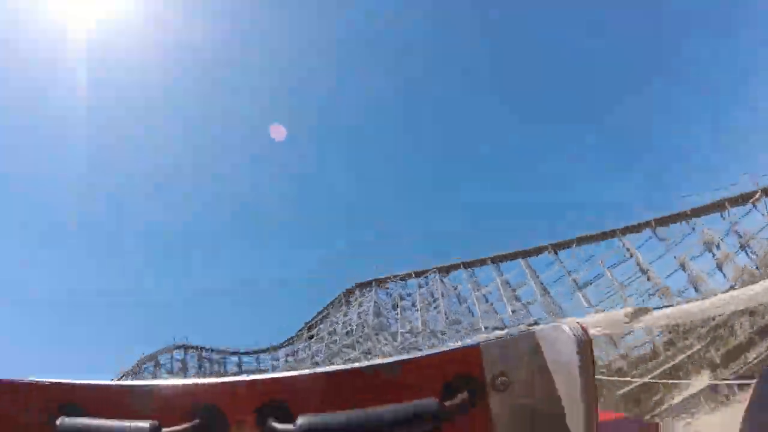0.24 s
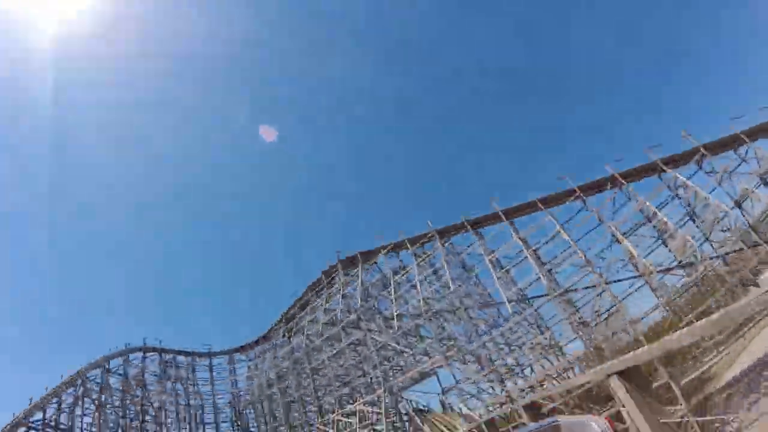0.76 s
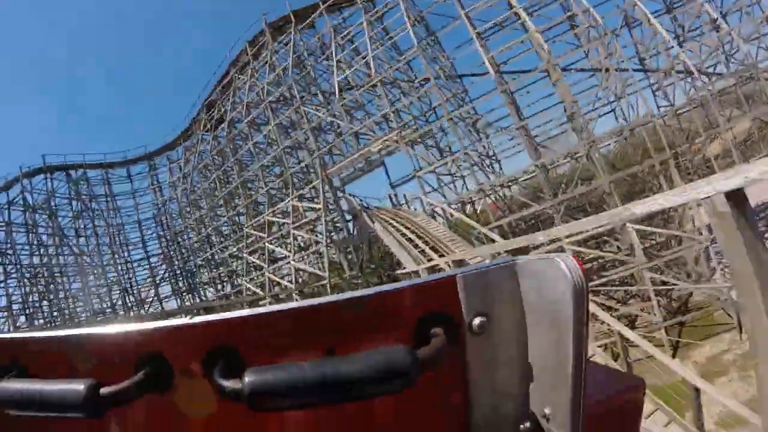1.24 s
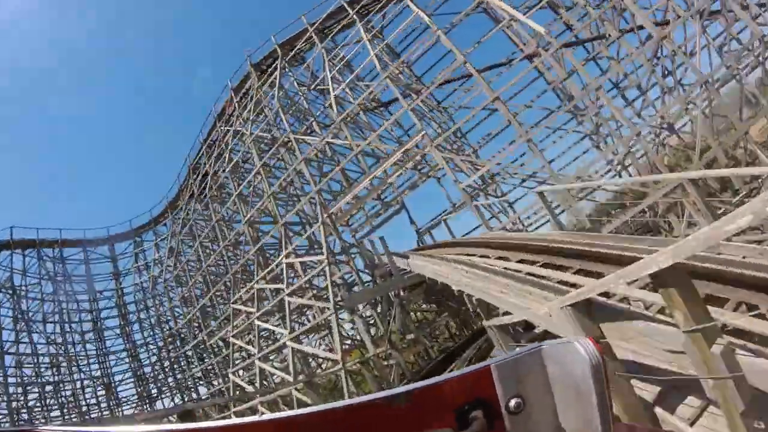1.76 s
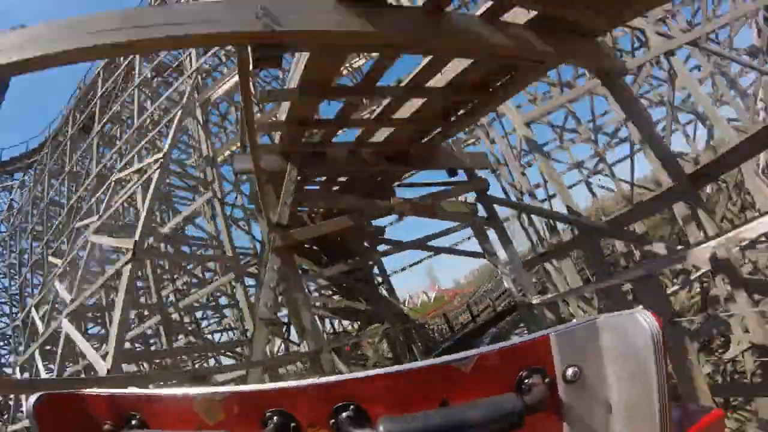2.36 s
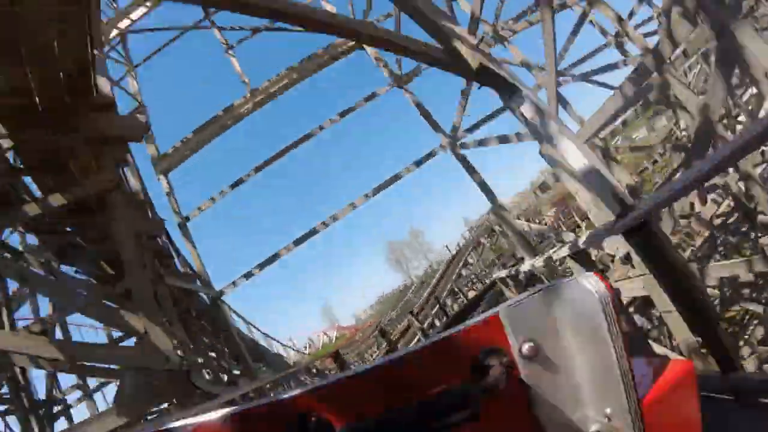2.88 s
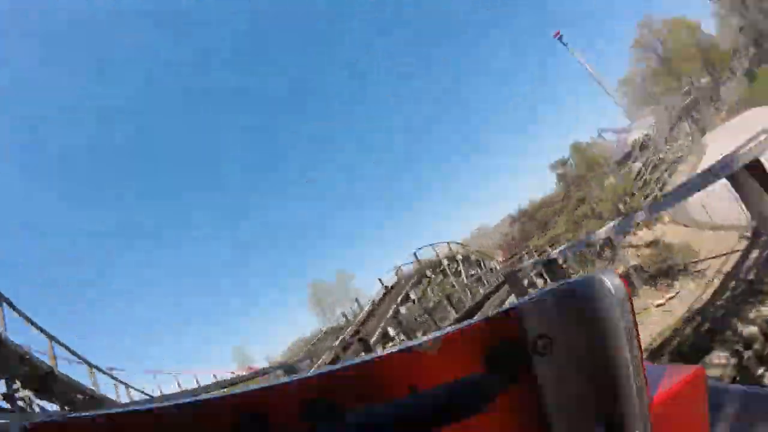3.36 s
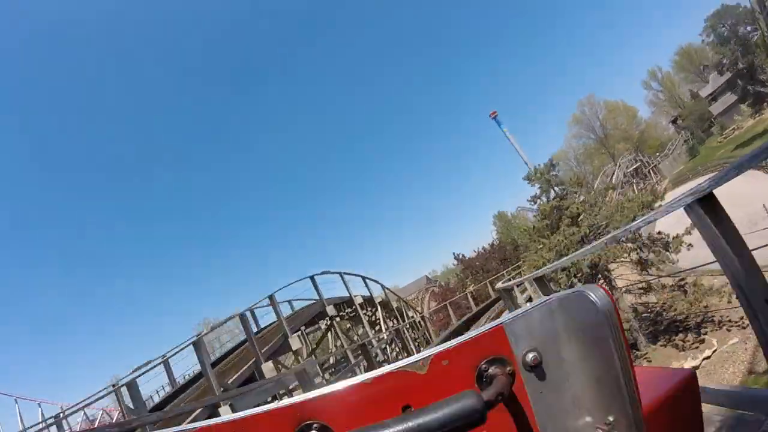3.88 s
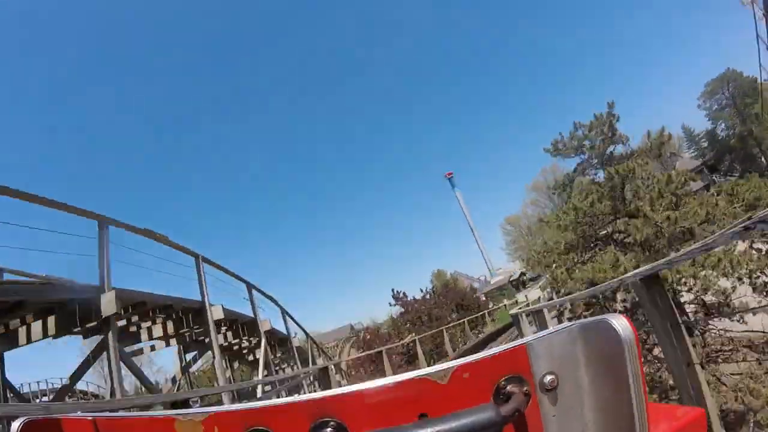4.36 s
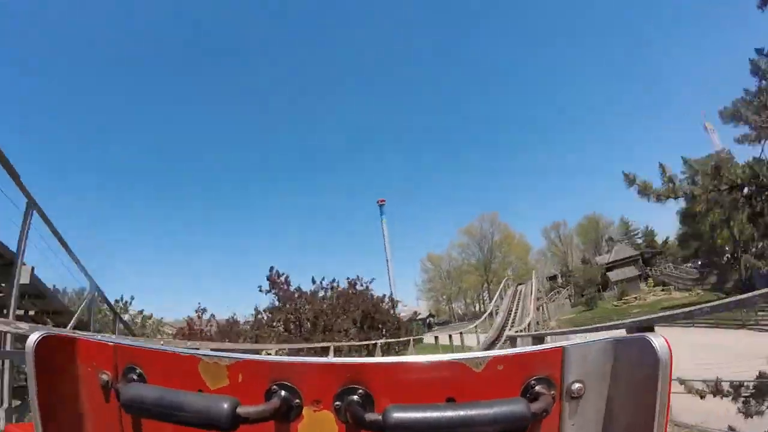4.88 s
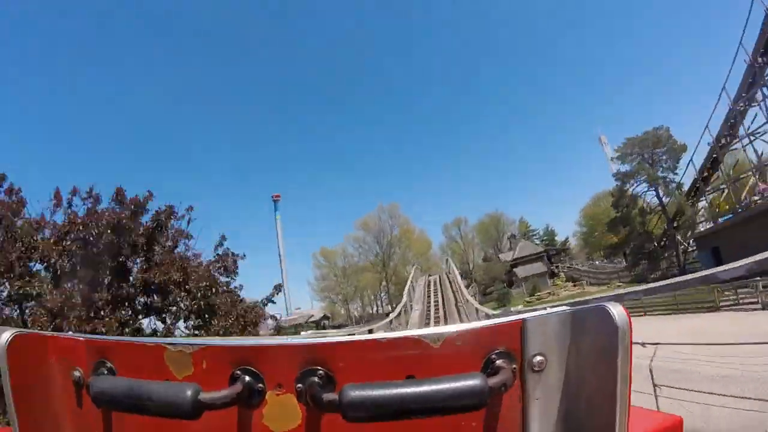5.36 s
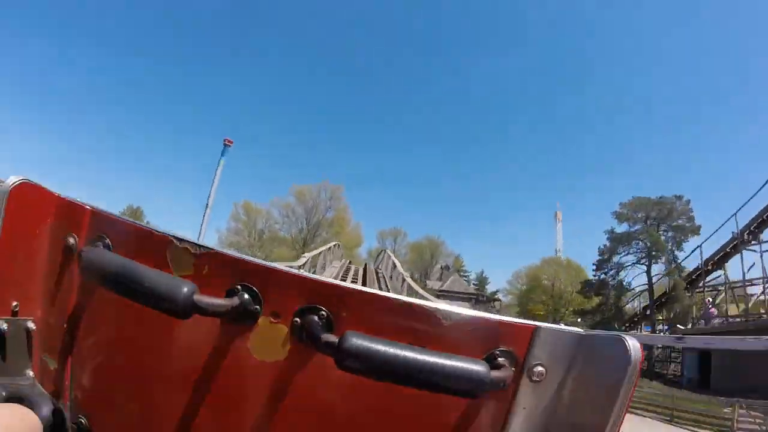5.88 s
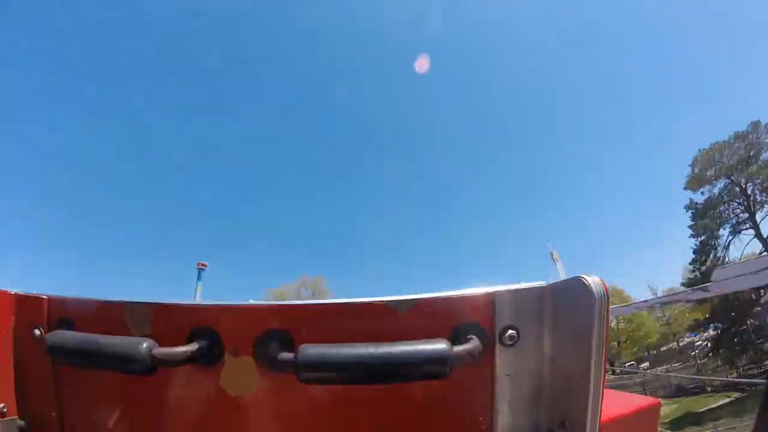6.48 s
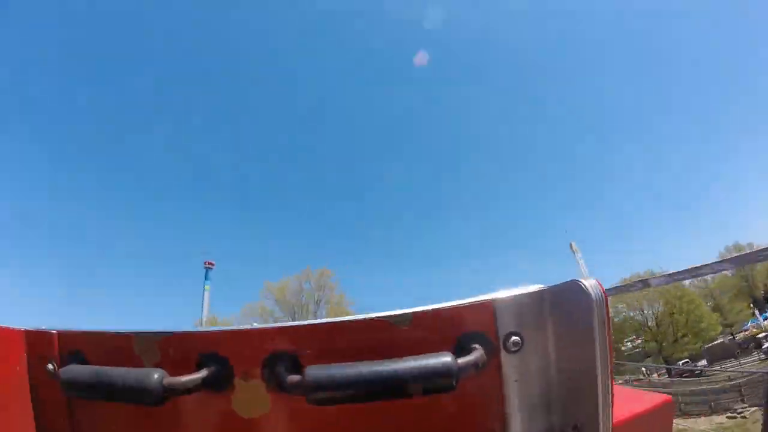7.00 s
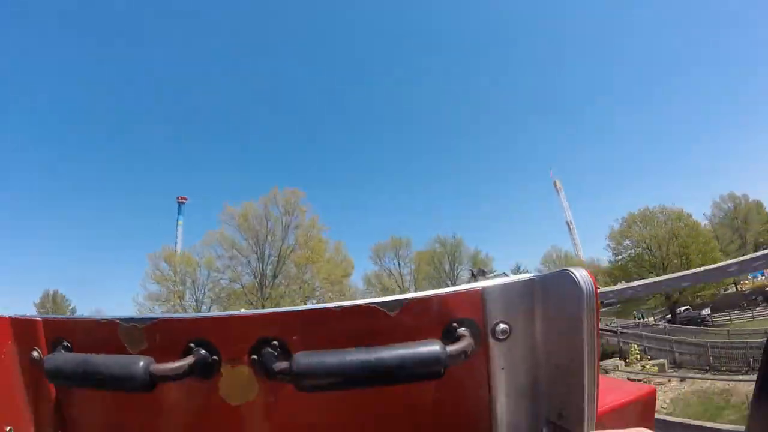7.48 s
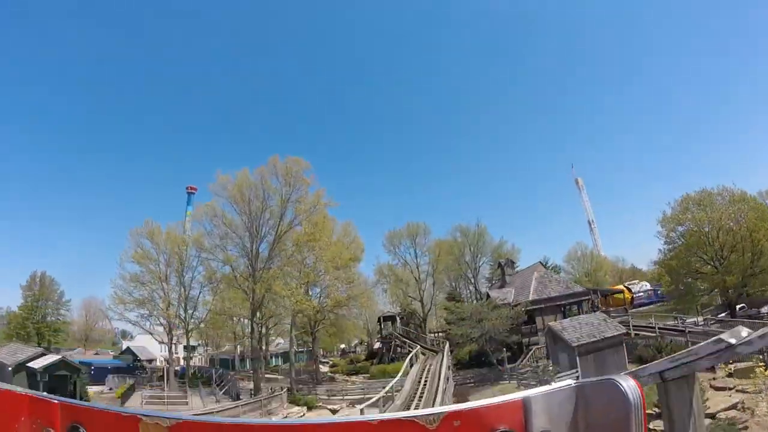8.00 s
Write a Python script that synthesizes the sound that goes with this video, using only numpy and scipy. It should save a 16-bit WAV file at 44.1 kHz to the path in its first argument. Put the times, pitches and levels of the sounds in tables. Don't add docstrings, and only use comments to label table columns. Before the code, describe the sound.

A close, rough outdoor ride sound: dense low wheel rumble, gritty midrange rattle and duller hiss, surging and easing with load. Irregular clacks ring the microphone case like a small hollow box, while deep jolts and tiny bright ticks come through the mount. Air pressure thumps the microphone, gusting near two seconds and cutting the sound into brief dips between six and seven, before the clatter runs on.

```python
import sys
import numpy as np
from scipy import signal
from scipy.fft import rfft, irfft
from scipy.io import wavfile
from scipy.ndimage import uniform_filter1d

SR = 44100
rng = np.random.default_rng(int(sys.argv[2]) if len(sys.argv) > 2 else 0)


def store_wav(level_fs):
    pcm = np.round(np.clip(np.atleast_2d(level_fs), -1, 1) * 32767)
    wavfile.write(sys.argv[1], SR, pcm.T.astype(np.int16))


def nominal_scale(level):
    x = np.asarray(level, float) / 20
    return 10 ** x


N = 363384
T = np.arange(N) / SR
HZ = np.fft.rfftfreq(N, 1 / SR) + 1e-3

# start in seconds, rattle level in dB, rub in dB.
WHEEL_LOAD = [(0.0, -40, 1.5), (0.48, -47.5, 2), (0.73, -36, -2.5), (1.24, -29.5, -2.5), (2.16, -32.5, 2.5),
              (2.36, -36, -2), (2.94, -29, 1.5), (3.42, -33, 0), (3.63, -30, -0.5), (3.95, -34, 0.5),
              (5.12, -30.5, -1), (5.21, -27, 1), (5.55, -33.5, 0), (6.17, -32, 5.5), (6.52, -36.5, 4.5),
              (6.75, -36, 3.5), (8.01, -37, 1.5), (8.24, -32.5, 5.5)]
# middle in seconds, depth in dB.
WHEEL_LULLS = [(0.06, 4), (0.72, 2.5), (0.83, 2.5), (1.06, 3), (3.28, 1.5), (4.08, 4.5), (4.92, 5),
               (5.165, 5.5), (5.56, 5), (5.7, 3.5), (1.29, 1), (1.945, 1.5), (3.655, 3.5), (5.005, -0.5),
               (3.73, -1), (7.16, -0.5), (7.72, -1.5)]
# start in seconds, peak in dB, bright part in dB, t60 in seconds.
TRACK_JOINTS = [(0.179, -23, -24, 0.72), (0.65, -21, -26, 0.3), (0.87, -18.5, -20, 0.21),
                (1.085, -11, -22, 0.26), (1.181, -6.5, -31, 0.1), (1.31, -22, -23, 0.86),
                (1.462, -20, -22, 0.34), (1.617, -16.5, -27, 0.26), (1.964, -11, -30, 0.85),
                (2.068, -11.5, -27, 0.6), (2.461, -15.5, -22.5, 0.89), (2.558, -14.5, -24, 0.7),
                (2.942, -17, -22, 0.73), (3.107, -12, -22.5, 0.28), (3.441, -14, -20, 0.25),
                (3.567, -8.5, -24.5, 0.083), (3.672, -16.5, -24, 0.63), (4.13, -23, -29, 0.063),
                (4.313, -21, -16, 0.9), (4.423, -6, -22, 0.051), (4.757, -18, -20.5, 0.39),
                (4.865, -16, -24, 0.15), (5.024, -20.5, -18.5, 0.62), (5.192, -22.5, -22, 0.85),
                (5.787, -13, -30, 0.39), (6.175, -18, -28, 1), (6.443, -5.5, -31, 0.087),
                (7.552, -19, -24, 0.22), (8.052, -9.5, -24.5, 0.33), (8.131, -13.5, -27, 0.98)]
# start in seconds, peak in dB.
BOLT_BUMPS = [(0.982, -14.5), (1.206, -11), (0.27, -14.5), (1.792, -18.5), (2.19, -21.5), (1.39, -11.5),
              (3.331, -15.5), (4.39, -10.5), (5.235, -23), (5.305, -19), (5.624, -20), (6.245, -13),
              (7.39, -24), (2.241, -15.5), (2.525, -16), (2.832, -21), (2.984, -15), (3.039, -14),
              (3.067, -13.5), (3.5, -27), (3.609, -14), (5.669, -16.5), (4.361, -18.5), (4.689, -27),
              (4.891, -15), (5.114, -28), (5.488, -24), (5.6, -19), (5.992, -17.5), (6.492, -22),
              (0.53, -27), (0.585, -37), (0.7, -22), (6.656, -36), (7.598, -14), (6.868, -20),
              (7.123, -17.5), (7.658, -17), (7.894, -16.5)]
# start in seconds, peak in dB.
FITTING_JINGLES = [(0.156, -33), (0.226, -35.5), (0.255, -32), (0.3012, -35), (0.386, -42), (0.53, -50),
                   (1.4, -33), (1.86, -28), (3.05, -30), (6.09, -32), (6.465, -33), (7.356, -28),
                   (0.982, -27.5), (1.0879, -32), (1.1179, -25), (1.1792, -25), (1.2087, -22.5),
                   (4.665, -27.5), (1.9719, -14.5), (2.175, -25.5), (4.545, -25), (2.5112, -34),
                   (2.813, -25), (3.605, -21.5), (3.334, -25.5), (3.421, -26), (3.85, -26), (3.7584, -31),
                   (4.137, -27), (4.4233, -39), (4.5101, -27), (5.1911, -24), (5.305, -28), (5.9638, -31),
                   (6.016, -39), (6.5415, -39), (6.86, -24), (6.9465, -27), (7.1256, -29), (5.235, -27),
                   (5.62, -31), (8.2112, -42)]
# frequency in Hz, density in dB per Hz.
CASE_PATH = [(45, 1), (70, -9), (120, -7.5), (240, -15), (880, -24), (1430, -15), (2250, -35.5),
             (2850, -25), (3700, -49), (5700, -57), (7400, -59.5), (9000, -73.5), (12500, -90),
             (16000, -99)]
# centre in Hz, width in Hz, lift in dB.
CASE_RESONANCES = [(1390, 48, -3.5), (2770, 850, -3.5), (4397, 120, 5.5), (5070, 650, 4.5),
                   (6235, 300, 8.5), (10700, 820, 3.5)]
# start in seconds, peak in dB, ring in Hz.
CAVITY_RAPS = [(0.2763, -16.5, 1570), (0.304, -23, 1310), (0.4798, -26.5, 1265), (0.6505, -13.5, 1450),
               (0.9772, -18, 1240), (1.0854, -11, 1390), (1.1822, -13.5, 1390), (1.209, -10, 1460),
               (1.3098, -13, 1440), (1.3473, -12, 1310), (1.461, -17, 1530), (1.5346, -14, 1290),
               (1.5589, -28, 1320), (1.6197, -11.5, 1310), (1.72, -20, 1220), (1.7915, -17, 1230),
               (1.9624, -12, 1350), (2.0702, -7, 1390), (2.2427, -19, 1520), (2.3361, -24, 1390),
               (2.3965, -21, 1310), (2.5566, -13, 1510), (2.8295, -10, 1536), (2.953, -10.5, 1480),
               (2.987, -13, 1180), (3.0415, -10, 1246), (3.0694, -20, 1440), (3.121, -10.5, 1495),
               (3.5039, -13, 1380), (3.5648, -11.5, 1465), (3.6077, -12, 1470), (3.6726, -12.5, 1440),
               (4.1315, -12, 1520), (4.3188, -17, 1280), (4.3615, -18, 1330), (4.4269, -13, 1240),
               (4.6167, -20, 1350), (4.6897, -15.5, 1320), (4.7232, -18, 1460), (4.7596, -10.5, 1420),
               (4.8648, -14, 1380), (5.0215, -14.5, 1390), (5.118, -13.5, 1240), (5.194, -14.5, 1290),
               (5.4856, -14, 1435), (5.6027, -14.5, 1430), (5.793, -15, 1450), (5.8167, -11, 1350),
               (6.0043, -16, 1210), (6.1794, -26, 1470), (6.4425, -30, 1220), (6.5415, -16, 1300),
               (6.6573, -26, 1390), (6.9995, -18, 1394), (7.1107, -21, 1380), (7.556, -17, 1460),
               (7.658, -29, 1360), (7.893, -15, 1140), (8.0541, -7.5, 1444), (8.1309, -18, 1420)]
# pitch ratio, level in dB, t60 in seconds.
CAVITY_PARTNERS = [(1.7, -25, 0.015), (0.531, -9.5, 0.059), (1.136, -7.5, 0.016)]
# start in seconds, peak in dB, ring in Hz.
UPPER_TAPS = [(0.3047, -36, 2650), (0.654, -21, 2770), (1.0854, -25, 2700), (1.119, -18, 2510),
              (1.1822, -23, 2920), (1.2145, -22, 2850), (1.4611, -36, 2730), (1.9724, -16, 2770),
              (2.074, -28, 2960), (2.14, -31, 2860), (2.2428, -32, 2920), (2.397, -22, 3020),
              (2.473, -27, 2660), (2.7921, -26, 2550), (2.9487, -30, 2700), (3.1093, -32, 2300),
              (3.4446, -35, 3100), (3.5658, -31, 2670), (3.7524, -26, 2790), (4.1295, -38, 3040),
              (4.2971, -29, 2840), (4.3615, -23, 2940), (4.427, -19, 2690), (4.6885, -25, 2700),
              (4.76, -26, 3030), (4.8688, -30, 2900), (5.116, -22, 2720), (5.1876, -37, 2930),
              (5.3118, -35, 2800), (5.4869, -35, 2700), (5.7468, -23, 3020), (5.9155, -21, 2540),
              (5.965, -27, 2730), (6.02, -18.5, 2570), (6.1225, -26, 2740), (6.2113, -19, 3030),
              (6.544, -18, 2990), (6.6583, -35, 2770), (6.6862, -26, 3000), (6.878, -34, 3140),
              (7.0145, -23, 2820), (7.1227, -19, 3020), (7.3562, -29, 2900), (7.5556, -23, 2960),
              (7.6081, -24, 2900), (7.657, -24, 2380), (7.8935, -19.5, 2840), (8.0554, -18, 2920),
              (8.08, -34, 2940), (8.172, -21, 3060)]
# start in seconds, peak in dB, ring in Hz.
FRAME_JOLTS = [(1.165, -30, 132), (1.859, -13, 200), (2.069, -4.5, 205), (2.154, -21, 129),
               (2.389, -27, 86.1), (2.556, -15, 153), (0.36, -24, 100), (3.355, -26, 99.6),
               (3.488, -14, 96.9), (3.559, -18, 112), (3.754, -9.5, 86.1), (4.304, -13, 91),
               (4.427, -13, 101), (4.956, -18, 86.1), (5.062, -7.5, 172), (5.248, -21, 145),
               (5.597, -14, 118), (5.765, -12, 101.4), (5.924, -8.5, 130), (6.013, -9, 107),
               (6.14, -20, 108), (6.254, -12, 87), (6.364, -26, 110), (6.448, -19, 86.1), (6.526, -15, 97),
               (6.68, -24, 212), (6.878, -13.5, 121), (6.951, -26, 86.1), (7.119, -14, 116),
               (7.207, -26, 108), (7.366, -19, 86.1), (7.421, -21, 86.5), (7.569, -17, 128),
               (7.82, -12, 137), (8.057, -20, 129), (7.93, -19, 100)]
# start in seconds, peak in dB, ring in Hz.
AXLE_DROPS = [(0.127, -11, 50.6), (0.302, -9, 51.1), (0.79, -13.5, 52), (1.064, -30, 80.7),
              (1.96, -16, 51.1), (2.28, -26, 51.1), (2.555, -28, 65), (3.203, -24, 70.0),
              (3.727, -28, 56.5), (4.091, -13.5, 68.6), (4.293, -18, 72.7), (4.433, -31, 51.1),
              (4.77, -25, 51.1), (4.992, -29, 51.1), (5.084, -31, 51.1), (5.285, -16, 56.5),
              (5.756, -16, 80.7), (5.996, -13, 51.1), (6.255, -26, 76), (6.371, -13, 72.7), (6.606, -7, 51),
              (6.794, -16, 51.1), (7.028, -20, 51.1), (8.16, -16, 99.6)]
# trough in seconds, crest in dB, trough in dB, choke in dB, recovery in seconds.
HARD_BUFFETS = [(0.319, -3, -5, 10.5, 0.089), (2.119, -5, -5, 5, 0.025), (2.564, -26, -5.5, 4.5, 0.14),
                (3.263, -3.5, -8, 2, 0.021), (4.459, -12, -1, 3, 0.035), (6.038, -12, 0.5, 4.5, 0.093),
                (6.395, -1, -2.5, 19.5, 0.099), (6.625, -2, -6.5, 18, 0.038), (6.809, -6, -5, 11, 0.078),
                (7.049, -6.5, -4.5, 5, 0.024), (7.289, -2.5, -4.5, 3.5, 0.091)]
# trough in seconds, crest in dB, trough in dB, crest lead in seconds.
SOFT_BUFFETS = [(0.145, -6, -3, 0.019), (0.525, -20, -9, 0.036), (1.281, -14, -10, 0.026),
                (1.513, -15, -7, 0.018), (1.854, -7, -6, 0.017), (1.938, -9, -5, 0.017),
                (2.035, -5, -6, 0.032), (2.165, -14, -9, 0.026), (2.26, -10, -4, 0.023),
                (2.42, -4, -4, 0.034), (2.614, -7, -7, 0.024), (2.665, -10, -7, 0.02),
                (2.709, -5, -4, 0.021), (2.894, -8, -9, 0.019), (3.028, -11, -5, 0.029),
                (3.216, -16, -6, 0.04), (3.37, -8, -6, 0.026), (3.515, -9, -4, 0.031),
                (3.758, -6, -4, 0.028), (3.912, -13, -5, 0.016), (3.949, -13, -3, 0.02),
                (4.132, -13, -6, 0.014), (4.254, -12, -10, 0.05), (4.603, -8, -3, 0.021),
                (4.751, -12, -9, 0.018), (4.824, -14, -8, 0.015), (4.863, -10, -10, 0.018),
                (4.959, -6, -6, 0.026), (5.289, -20, -7, 0.029), (5.337, -5, -3, 0.022),
                (5.48, -5, -3, 0.019), (5.582, -7, -8, 0.042), (5.686, -6, -4, 0.038),
                (5.965, -15, -6, 0.043), (6.219, -13, -4, 0.018), (6.319, -8, -4, 0.026),
                (7.425, -12, -9, 0.034), (8.203, -19, -9, 0.045)]
# start in seconds, peak in dB, ring in Hz, bright part in dB.
MOUNT_TICKS = [(0.304, -16.5, 1990, -18), (5.411, -24, 2000, -7), (2.3968, -9, 1980, -20.5),
               (3.108, -13, 2000, -31), (6.021, -23, 1880, -0.5), (6.374, -20, 2020, -34),
               (6.5417, -12.5, 1920, -8.5), (6.61, -28, 1850, -5), (6.6867, -22, 2900, -6),
               (6.9484, -18, 1980, -14), (7.1231, -20.5, 1900, -14), (7.274, -27, 1980, -18),
               (7.657, -23, 2060, -32), (7.893, -31.5, 2110, -21)]
# middle in seconds, depth in dB, half width in seconds.
SEAT_KNOCKS = [
    (0.275, -12.5, 0.0016),
    (2.077, -14, 0.0016),
    (5.771, -7, 0.0017),
    (6.384, -12, 0.0011),
    (6.545, -9.5, 0.0011),
    (6.6889, -22, 0.00075),
    (7.128, -11.5, 0.0011),
    (8.173, -9, 0.0025),
]
# start in seconds, peak in dB.
MOUNT_SPARKS = [(0.1436, -54), (0.3002, -46), (0.412, -62), (1.0859, -60), (2.3974, -50), (2.5491, -53),
                (2.952, -61), (3.1053, -51.5), (3.3777, -62), (3.5977, -54), (4.139, -59), (4.4223, -49),
                (4.5226, -56), (4.6638, -55), (5.1148, -53), (5.2081, -50), (5.7443, -53), (5.9668, -61),
                (6.0177, -48), (6.542, -60), (6.6079, -51), (6.6867, -63), (6.7925, -55), (7.2704, -57),
                (7.3137, -50), (8.0576, -60)]
# start in seconds, level in dB.
HEADWIND = [(0, -18), (.3, -31), (.55, -29.5), (1.1, -29), (1.8, -26), (2.1, -11.5), (2.6, -27.5),
            (3.0, -21), (4.0, -27), (5.1, -23), (5.5, -25), (6.2, -26), (6.35, -34), (7.0, -29.5),
            (7.4, -26), (7.9, -41.5), (8.24, -22.5)]
# frequency in Hz, density in dB per Hz.
HEAVE_SPECTRUM = [(2, -23.5), (5, 13), (12, 2), (24, 0), (35, -4.5), (60, -21), (100, -43), (300, -120)]
# frequency in Hz, level in dB, width in Hz.
BEARING_WHINE = [(9650, -79, 6)]


def rms_one(x):
    return x / np.sqrt(np.mean(x ** 2) + 1e-20)


def at_hz(points, hz):
    point_hz, db = np.transpose(points)
    return np.interp(np.log(hz), np.log(point_hz), db)


def in_time(rows):
    s, *columns = np.transpose(rows)
    return [np.interp(T, s, c) for c in columns]


def drift(rate):
    r = np.exp(-80 * np.pi * rate / SR)
    slow = signal.lfilter([1], [1, -2 * r, r * r], rng.standard_normal(N // 40 + 2002))[2000:]
    return np.interp(np.arange(N) / 40, np.arange(len(slow)), rms_one(slow))


def causal_colour(x, gain_db):
    cepstrum = irfft(gain_db * np.log(10) / 20, N)
    cepstrum[1:N // 2] *= 2
    cepstrum[N // 2 + 1:] = 0
    return irfft(rfft(x) * np.exp(rfft(cepstrum)), N)


def ring(x, hz, t60):
    r, w = nominal_scale(-60 / (t60 * SR)), 2 * np.pi * hz / SR
    return signal.lfilter([0, np.sin(w)], [1, -2 * r * np.cos(w), r * r], x)


def struck(rows, rise, chance):
    out, t = np.zeros(N + SR), T[:SR // 8]
    for (s, db, hz, t60), phase in zip(rows, chance):
        at = round(s * SR)
        envelope = nominal_scale(db - 60 * t / t60) * (1 - np.exp(-t / rise))
        out[at:at + len(t)] += envelope * np.sin(2 * np.pi * (hz * t + phase))
    return out[:N]


def add_blow(power, s, db, rise, t60):
    at = round(s * SR)
    t = T[:min(N - at, SR // 2)]
    envelope = nominal_scale(db - 60 * t / np.clip(t60, .006, .6)) * (1 - np.exp(-t / rise))
    power[at:at + len(t)] += envelope ** 2


def rounded(x, top):
    return x / (1 + (np.abs(x) / top) ** 4) ** .25


def rolling_db():
    load_db, rub_db = in_time(WHEEL_LOAD)
    swing = load_db + 33
    rumble_db = -30 + 0.83 * swing + 0.39 * rub_db
    hiss_db = -54 + 0.97 * swing + rub_db
    return rumble_db, load_db, hiss_db


def joint_power():
    low, mid, top = power = np.zeros((3, N))
    bumps = [(s, db, -28.5, 0.13) for s, db in BOLT_BUMPS]
    for s, db, bright, t60 in [*TRACK_JOINTS, *bumps]:
        add_blow(low, s, db - 8.5, .004, 1.12 * t60)
        add_blow(mid, s, db - 10, .0012, t60)
        add_blow(mid, s, db - 24, .0005, .035)
        add_blow(top, s, db + bright - 4.5, .005, t60)
    for s, db in FITTING_JINGLES:
        add_blow(top, s, db - 9.5, .009, 0.1)
    return power


def case_db():
    rings = sum(db / (1 + ((HZ - hz) / width * 2) ** 2) for hz, width, db in CASE_RESONANCES)
    return at_hz(CASE_PATH, HZ) + rings


def rough_contact():
    grains_per_s, grain_share = 2500, 0.55
    strength = nominal_scale(3.0 * np.minimum(rng.exponential(1, N), 2.8))
    grains = (rng.random(N) < grains_per_s / SR) * strength * rng.choice([-1, 1], N)
    return np.sqrt(grain_share) * rms_one(grains) + np.sqrt(1 - grain_share) * rng.standard_normal(N)


def wheels():
    lull_s = 0.022
    lull_db = sum(depth_db * np.exp(-((T - s) / lull_s) ** 2) for s, depth_db in WHEEL_LULLS)
    steady = [nominal_scale(db - lull_db) ** 2 for db in rolling_db()]
    level = np.sqrt(steady + joint_power())
    contact, colour = rfft(rough_contact()), case_db()
    registers = [(55, 600), (700, 3500), (3600, 9000)]   # rumble, rattle, hiss [Hz]
    passed = [np.sqrt(np.sum(nominal_scale(colour[(HZ > a) & (HZ < b)]) ** 2) / len(HZ)) for a, b in registers]
    shudder_db = 0.9 * drift(19.6) + 1.72 * drift(69)
    place, out = np.log2(HZ / 40) * 1.5, 0
    corners = np.log2([400, 900, 3200, 4200])
    for k in range(14):
        band = irfft(contact * np.cos(np.pi / 2 * np.clip(place - k, -1, 1)) ** 2, N)
        octave = np.log2(40 * 2 ** (k / 1.5))
        weight = [np.interp(octave, corners, np.equal([0, 1, 1, 2], j)) for j in range(3)]
        gain = sum(w * v / p for w, v, p in zip(weight, level, passed))
        own_db = 1.5 * (2 if k > 11 else 1) * drift(18.0)
        out = out + band * gain * nominal_scale(min(k / 6, 1) * shudder_db + own_db)
    return causal_colour(out, colour)


def raps():
    chance = rng.random((len(CAVITY_RAPS), 4, 2))
    modes = [(1, 0.012, 0.037), *CAVITY_PARTNERS]
    rows = []
    for (s, db, hz), draws in zip(CAVITY_RAPS, chance):
        for (ratio, lift, t60), c in zip(modes, draws):
            uneven_db = 6.8 * (c[0] - .5) * (ratio != 1)
            rows.append((s, db - 3 + lift + uneven_db, hz * ratio, t60))
    return struck(rows, 0.00059, chance[..., 1].ravel())


def taps():
    rows = [(s, db - 5.5, hz * ratio, 0.019) for s, db, hz in UPPER_TAPS for ratio in (1, 1.07)]
    return struck(rows, 0.00059, rng.random(len(rows)))


def jolts():
    rows = [(s, db - 0.5, hz, 9.1 / hz) for s, db, hz in [*FRAME_JOLTS, *AXLE_DROPS]]
    return struck(rows, 0.003, rng.random(len(rows)))


def buffets():
    swing, choke_db = np.zeros(N), np.zeros(N)
    hard_lead_s, hard_settle_s, soft_settle_s = 0.015, 0.017, 0.012
    choke_lag_s, choke_edge_s = 0.004, 0.007
    hard = [(s, crest, trough, hard_lead_s, hard_settle_s, choke, recover)
            for s, crest, trough, choke, recover in HARD_BUFFETS]
    soft = [(s, crest, trough, lead, soft_settle_s, 0, 1) for s, crest, trough, lead in SOFT_BUFFETS]
    for s, crest_db, trough_db, lead, settle_s, choke, recover in hard + soft:
        near = slice(max(0, round((s - .2) * SR)), round((s + .5) * SR))
        t = T[near] - s
        turn = np.pi / 2 * np.clip(t / lead + 1, 0, 1)
        rise = nominal_scale(crest_db) / np.cosh(np.minimum(t + lead, 0) / (0.91 * lead) * 2) * np.cos(turn) ** 2
        fall = nominal_scale(trough_db) / np.cosh(np.maximum(t, 0) / settle_s * 2) * np.sin(turn) ** 2
        swing[near] += rise - fall
        shut = np.clip((t - choke_lag_s) / choke_edge_s, 0, 1)
        choke_db[near] -= max(choke, 0) * shut * np.clip(2.16 * (1 - t / recover), 0, 1)
    return swing, choke_db


def ticks():
    length = 900
    out, chance = np.zeros(N), rng.normal(0, 1, (len(MOUNT_TICKS), 2, length))
    bright_band = signal.butter(3, [3000, 6300], "band", fs=SR, output="sos")
    snap_band = signal.butter(2, [1650, 3100], "band", fs=SR, output="sos")
    dull = signal.butter(4, 3700, fs=SR, output="sos")
    slips = np.zeros(length)
    slips[[28, 49, 130]] = [.7, .7, .45]
    burst = signal.lfilter([1], [1, -nominal_scale(-60 / (0.0076 * SR))], slips)
    clink = nominal_scale(-5) * ring(slips, 5500, 0.011)
    for (s, db, hz, bright), scratch in zip(MOUNT_TICKS, chance):
        snap = signal.sosfilt(snap_band, nominal_scale(6.0) * slips + nominal_scale(1.0) * burst * scratch[0])
        body = 0.7 * ring(slips, hz, 0.014) + 0.58 * ring(slips, hz * 1.25, 0.0057) + snap
        crack = signal.sosfilt(bright_band, burst * scratch[1]) + clink
        at = round(s * SR)
        out[at:at + length] += nominal_scale(db) * (signal.sosfilt(dull, body) * 1.16 + nominal_scale(bright - 0.5) * crack)
    return out


def knocks():
    return -sum(nominal_scale(db) * np.exp(-((T - s) / width) ** 2) for s, db, width in SEAT_KNOCKS)


def sparks():
    power = np.zeros(N)
    for s, db in MOUNT_SPARKS:
        add_blow(power, s, db + 8.5, .0006, .009)
    bright = signal.butter(2, [3500, 10000], "band", fs=SR, output="sos")
    return np.sqrt(power) * rms_one(signal.sosfilt(bright, rng.standard_normal(N)))


def heave():
    slow = irfft(rfft(rng.standard_normal(N)) * nominal_scale(at_hz(HEAVE_SPECTRUM, HZ)), N)
    return rms_one(slow) * nominal_scale(in_time(HEADWIND)[0] + 10.0)


def whine():
    load_db = .6 * (rolling_db()[2] + 42.0) + 2.7 * drift(9)
    out = np.zeros(N)
    for hz, db, width in BEARING_WHINE:
        cycles = hz * T + np.cumsum(drift(20)) * width / SR
        out += nominal_scale(db + load_db) * np.sin(2 * np.pi * cycles) * np.sqrt(2)
    return out


def self_noise():
    return nominal_scale(-95) * rng.standard_normal(N)


def scene():
    swing, choke_db = buffets()
    calm = 1 / (1 + uniform_filter1d(swing ** 2, size=2000) / .015)
    air = rounded(swing + nominal_scale(choke_db) * calm * heave(), 1.0)
    rolling = nominal_scale(choke_db) * (wheels() + whine())
    ringing = nominal_scale(choke_db / 2) * (raps() + jolts() + taps())
    mount = ticks() + knocks() + sparks()
    return (air + rolling + ringing + mount + self_noise())[None]


def band_limit(x):
    return signal.sosfilt(signal.butter(12, 15720, fs=SR, output="sos"), x)


def record(dry):
    coupled = signal.sosfilt(signal.butter(1, 3, "high", fs=SR, output="sos"), dry)
    mix = rounded(coupled, 1.3)
    return band_limit(mix)


dry = scene()
out = record(dry)
store_wav(out)
```